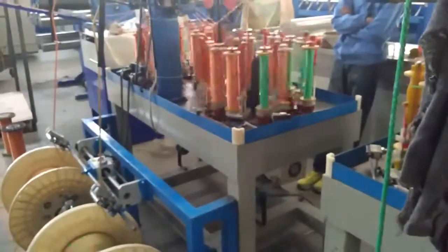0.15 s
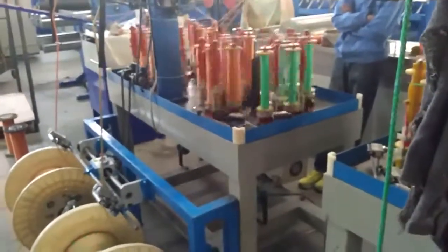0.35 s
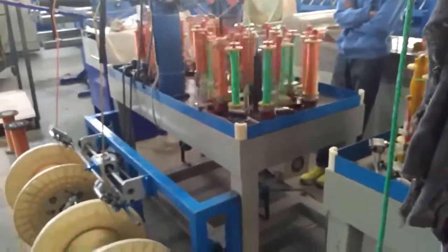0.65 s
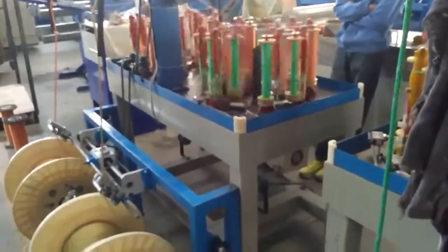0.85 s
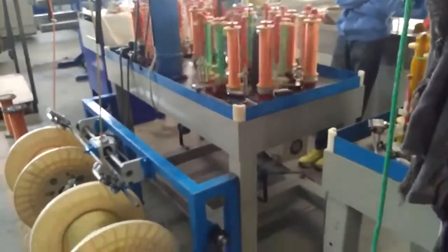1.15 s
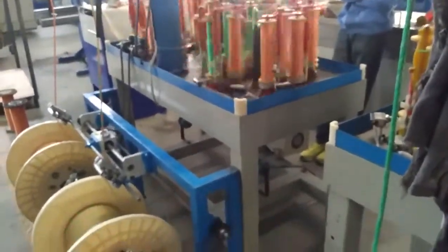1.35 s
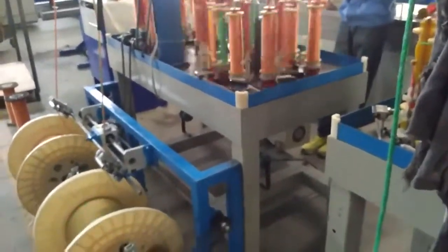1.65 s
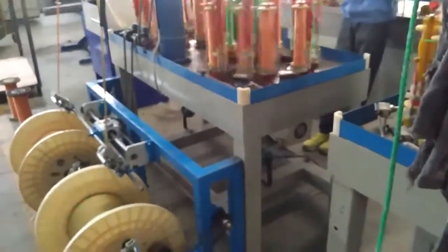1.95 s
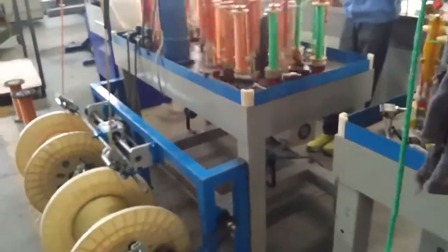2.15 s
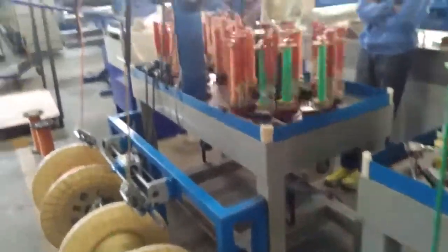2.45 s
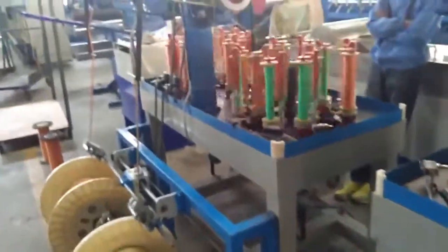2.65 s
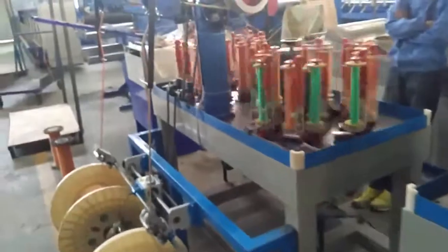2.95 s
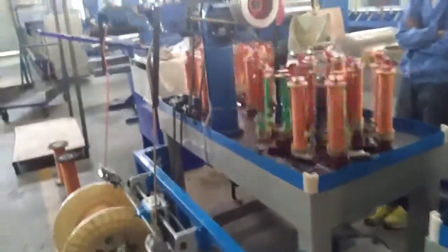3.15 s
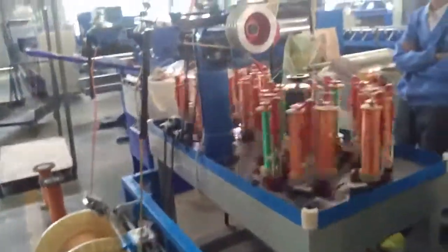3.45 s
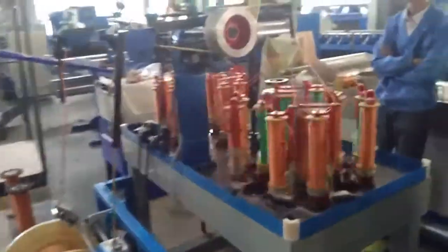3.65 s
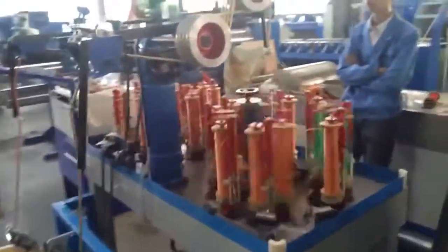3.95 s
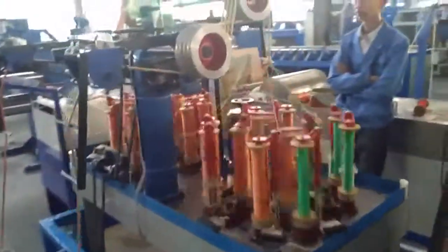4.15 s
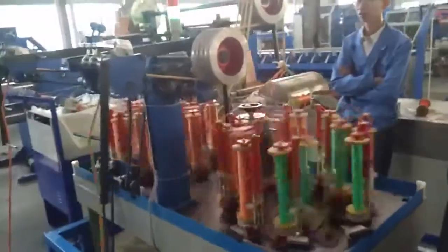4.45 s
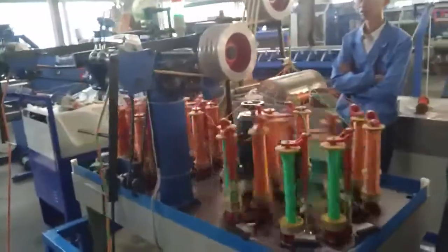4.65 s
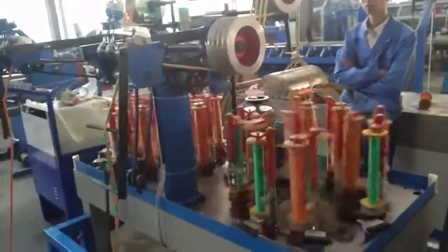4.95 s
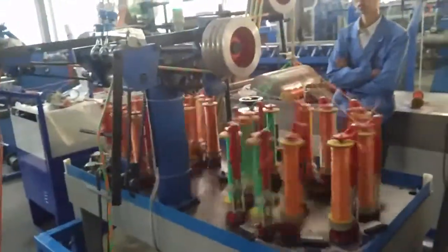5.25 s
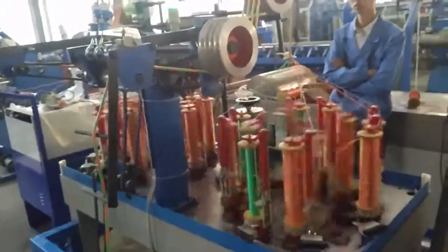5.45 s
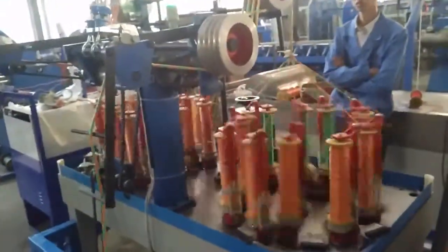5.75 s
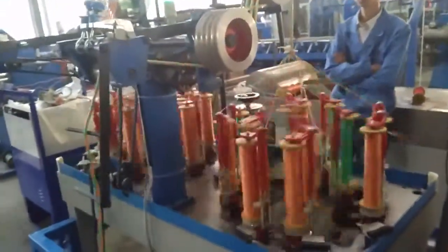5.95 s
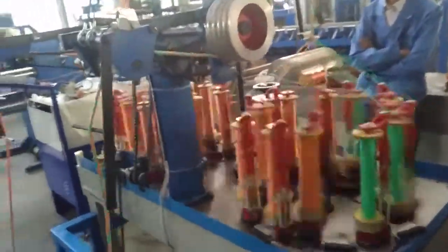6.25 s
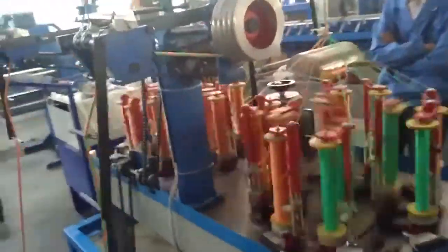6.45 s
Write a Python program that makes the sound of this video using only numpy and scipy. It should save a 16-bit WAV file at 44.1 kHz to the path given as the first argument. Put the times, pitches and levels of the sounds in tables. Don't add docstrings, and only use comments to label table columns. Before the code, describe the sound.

Several rope braiding machines run nonstop in a hard, reverberant factory hall. Bobbin carriers rattle around steel decks, clattering in quick even pulses about six a second, above a low drumming plate hum and a dense roar of farther machines. A faint high gear whine throbs within. A handheld stereo microphone moves nearer, so the metallic clatter gradually gets crisper; the sound is thin in the bass and slightly rough on top.

```python
import sys
import numpy as np
from scipy import signal
from scipy.io import wavfile
from scipy.ndimage import uniform_filter1d

SR = 44100
rng = np.random.default_rng(int(sys.argv[2]) if len(sys.argv) > 2 else 0)


def to_wav(s):
    ch = np.atleast_2d(s).T
    pcm = np.round(np.clip(ch, -1, 1) * 32767)
    wavfile.write(sys.argv[1], SR, pcm.astype(np.int16))


N = 291060

HANDOVERS_PER_S = 6.085
SIDES = np.array([[1], [-1]])
# frequency in Hz, level in dB per Hz.
CLATTER_SPECTRUM = [(1500, -20), (3000, -18), (5000, 2.5), (7000, 3.5), (9000, -1), (11000, 1), (13000, -4),
                    (15000, 5)]
# time in seconds, nearness from 0 to 1.
NEARNESS = [
    (0, 0.2),
    (1.2, 0.05),
    (2.4, 0.06),
    (3.4, 0.16),
    (4.4, 0.5),
    (5.4, 0.77),
    (6.6, 1.0),
]


def from_db(db):
    return 10 ** (np.asarray(db) / 20)


def mid_one(x):
    return x / np.sqrt(np.mean(x.mean(0) ** 2) + 1e-20)


def at_hz(points, hz):
    points_hz, values = np.array(points).T
    return np.interp(np.log(hz), np.log(points_hz), values)


def nearness_at(s):
    times, near = np.transpose(NEARNESS)
    return np.interp(s, times, near)


def drift(rate_hz):
    r = np.exp(-80 * np.pi * rate_hz / SR)
    slow = signal.lfilter([1], [1, -2 * r, r * r], rng.standard_normal(N // 40 + 2002))[2000:]
    return np.interp(np.arange(N) / 40, np.arange(len(slow)), slow / slow.std())


def resonance(x, hz, width_hz):
    r = np.exp(-np.pi * width_hz / SR)
    feed = np.sqrt((1 - r * r) / 2) * np.array([1, 0, -1])
    return signal.lfilter(feed, [1, -2 * r * np.cos(2 * np.pi * hz / SR), r * r], x)


def heard(pair, hz):
    # frequency in Hz, left-right correlation.
    likeness = [(40, .75), (67, .6), (106, .35), (170, .72), (270, 0.93), (340, 0.9), (430, 1), (540, 0.65),
                (855, 0.87), (1080, 0.61), (1360, -0.18), (1710, -0.43), (2150, 0.34), (2700, 0.21),
                (3400, -0.075), (5400, -0.2), (9000, -0.13)]
    # frequency in Hz, left over right in dB.
    lean = [(60, 0.0), (91, 2), (140, 1), (210, 2.5), (320, -1.5), (490, -3), (740, -2.5), (1130, -3.5),
            (1710, 3.5), (2600, 2.5), (3960, -1), (6020, 0), (9160, 0.5), (13900, -0.5)]
    # frequency in Hz, phase in radians.
    right_leads = [(100, 0), (170, .9), (340, .6), (430, .5), (680, .1), (900, 0)]
    alike = np.clip(at_hz(likeness, hz), -.9, .99)
    apart = np.sqrt((1 - alike) / (1 + alike)) * pair[1] * SIDES
    left, right = (pair[0] + apart) * from_db(at_hz(lean, hz) * SIDES / 2)
    lag_s = at_hz(right_leads, hz) / (2 * np.pi * hz)
    return np.array([np.roll(left, round(lag_s * SR)), right])


def impacts(per_s, spread_db):
    sizes = from_db(spread_db * np.minimum(rng.exponential(1, (4, N)), 4))
    sizes = sizes * rng.choice([-1, 1], (4, N))
    hits = sizes * (rng.random((4, N)) < per_s / SR)
    return (hits / hits.std()).reshape(2, 2, N) + 1e-18


def through_bands(drive, spectrum, low_hz, swing_db):
    edges = low_hz * 2 ** np.arange(0, np.log2(15500 / low_hz), 1 / 6)
    out = 0
    for k, (low, high) in enumerate(zip(edges, edges[1:])):
        hz = np.sqrt(low * high)
        band = signal.butter(2, [low, high], "band", fs=SR, output="sos")
        pair = signal.sosfilt(band, drive[k % 2])
        out = out + from_db(at_hz(spectrum, hz) + swing_db(hz)) * heard(pair, hz)
    return mid_one(out)


def contact_swells(turns):
    # phase from 0 to 1, fade in cycles,
    # then the swell of din, upper din and clatter in dB.
    contacts = [
        (0.169, 0.255, 1.5, 3, 6),
        (.46, .9, 2, 4, 6.0),
    ]
    rise_s = 0.0045
    swells = 0
    for phase, fade, *lift_db in contacts:
        swells = swells + np.outer(lift_db, np.exp(-((turns - phase) % 1) / fade))
    swells = uniform_filter1d(swells, size=round(rise_s * SR), axis=1)
    return swells - swells.mean(axis=1, keepdims=True)


def clatter(effort_db):
    bursts_db = 1.2 * effort_db + 1.9 * drift(25.0)
    drive = impacts(per_s=5000 * from_db(bursts_db), spread_db=2.5)

    def swing_db(hz):
        return 1.15 * np.log2(hz / 3000) * effort_db + 2.0 * drift(15.0)
    return through_bands(drive, CLATTER_SPECTRUM, 1366, swing_db)


def rings(effort_db):
    hits = impacts(per_s=900 * from_db(effort_db), spread_db=3.0)[0]
    dealt = rng.integers(0, 48, (2, N))
    pitches = np.geomspace(3000, 13800, 48) * (1 + .01 * rng.standard_normal(48))
    out = 0
    for k, hz in enumerate(pitches):
        level_db = at_hz(CLATTER_SPECTRUM, hz) + 2.0 * np.log2(7000 / hz)
        out = out + from_db(level_db) * resonance(hits * (dealt == k) + 1e-18, hz, 38.0)
    return mid_one(out)


def knock_list():
    # phase from 0 to 1, peak in dB, spread in dB, ring in Hz.
    knocks = [
        (.16, -30.5, 3.5, 6350),
        (.465, -32, 5.5, 8600),
    ]
    # time in seconds, peak in dB, ring in Hz.
    strays = [
        (0.0543, -15, 9660),
        (0.7327, -21, 6530),
        (2.8729, -18, 6470),
        (4.0018, -15, 10000),
        (4.357, -18, 7650),
        (5.476, -17, 7000),
        (6.0142, -17, 6460),
        (6.1594, -16, 7590),
    ]
    near_db, jitter_s = 0.5, .0025
    rows = list(strays)
    for phase, peak_db, spread_db, hz in knocks:
        luck = rng.standard_normal((int(N / SR * HANDOVERS_PER_S), 3))
        s = (np.arange(len(luck)) + phase) / HANDOVERS_PER_S + jitter_s * luck[:, 0]
        peaks_db = peak_db + near_db * nearness_at(s) + spread_db * luck[:, 1]
        rows += zip(s, peaks_db, hz * 2 ** (0.21 * luck[:, 2]))
    return rows


def ticks():
    after = np.arange(4410) / SR
    out = np.zeros((2, N + len(after)))
    top = signal.butter(2, 4000, "high", fs=SR, output="sos")
    for s, peak_db, hz in knock_list():
        burst = signal.sosfilt(top, rng.standard_normal(len(after)))
        burst = burst * from_db(-60 * after / 0.065)
        burst = .5 * burst + 0.95 * resonance(burst, hz, 1200.0)
        start = round(s * SR)
        side_db = rng.uniform(-1, 1) * SIDES
        out[:, start:start + len(after)] += from_db(peak_db - 13.5 + side_db) * burst
    return out[:, :N]


def boom(t, near):
    round_s, top_s, depth_db, sharpness, near_db = 1.333, 1.104, 4.5, 2.9, 4
    swell = np.exp(sharpness * (np.cos(2 * np.pi * (t - top_s) / round_s) - 1))
    return depth_db * swell + near_db * near - 2.5


def deck_swell(turns):
    once_db, once_top = 3.8, .88
    twice_db, twice_top = 2.4, 0.078
    once = once_db * np.cos(2 * np.pi * (turns - once_top))
    return once + twice_db * np.cos(4 * np.pi * (turns - twice_top))


def deck(beat_db, boom_db):
    # frequency in Hz, width in Hz, level in dB.
    plate_modes = [(266.7, 4.3, -12.5), (303.3, 31, -8), (323.5, 8.6, -3), (331.8, 12, -3.5),
                   (345.1, 8.5, -5.5), (368.4, 20, -3.5), (393.2, 15, -9.5), (452, 6.8, -15)]
    out = 0
    for hz, width_hz, level_db in plate_modes:
        drive = rng.standard_normal((2, N + SR // 2))
        pair = resonance(resonance(drive, hz, 1.8 * width_hz), hz, 1.8 * width_hz)[:, SR // 2:]
        pair /= np.abs(signal.hilbert(pair / pair.std())) ** .4 + .1
        upper = np.clip((hz - 336) / 24, 0, 1)
        late = round(upper * .5 / HANDOVERS_PER_S * SR)
        swell_db = (1 - upper) * boom_db + np.roll(beat_db, late)
        out = out + from_db(level_db + swell_db) * heard(pair / pair.std(), hz)
    return mid_one(out)


def thumps():
    count = int(N / SR * HANDOVERS_PER_S)
    luck = rng.standard_normal((count, 2))
    kicks = np.zeros(N)
    at_s = (np.arange(count) + .47 + 0.01 * luck[:, 0]) / HANDOVERS_PER_S
    kicks[(at_s * SR).astype(int)] = from_db(2 * luck[:, 1])
    fade = from_db(-60 / (.2 * SR))
    shake = signal.lfilter([1], [1, -fade], kicks + 1e-18) * rng.standard_normal((2, N))
    return mid_one(heard(resonance(resonance(shake, 203, 100), 203, 100), 236))


def mesh(turns):
    # side line number, level in dB.
    gear_lines = [
        (-1, -26.5),
        (0, -30.5),
        (1, -50),
        (2, -37),
    ]
    mesh_hz = 363.0
    t = np.arange(N) / SR
    tone = 0
    for k, db in gear_lines:
        level = from_db(db - 1.5 + 1.7 * drift(1.0))
        angle = 2 * np.pi * (mesh_hz * t + k * (turns - .17)) + 0.63 * drift(0.32)
        tone = tone + level * np.sin(angle)
    return heard([tone, np.zeros(N)], mesh_hz)


def din(low_db, high_db):
    # frequency in Hz, level in dB per Hz.
    din_spectrum = [(30, 8.5), (100, -30), (140, -22.5), (190, -12), (250, -13.5), (450, -7.5), (620, -10),
                    (850, -2), (1250, -3), (2300, -4.5), (2900, -10.5), (5000, -19), (8000, -37.5),
                    (14000, -41)]
    # frequency in Hz, width in Hz, level in dB,
    # left over right in dB, change on the walk in dB per second.
    frame_modes = [(861, 44, -14.5, -2, -.5), (980, 200, -18, -2, 2.2), (1202, 30, -13, 2, -0.4),
                   (1272, 40, -13.5, -1, -2.1), (1348, 22, -14.5, 7.5, 0.5), (1430, 69, -25, 0.5, 4),
                   (1664, 15, -31, -5, -1), (1772, 22, -19.5, -4.5, -2.5), (2053, 42, -18, -7, 0),
                   (2286, 125, -18, 9, -0.5), (2594, 74, -20, -4, 0.5)]
    together = drift(9.8)

    def swing_db(hz):
        share = np.clip(np.log2(hz / 1500) / 1.7, 0, 1)
        return (1 - share) * low_db + share * high_db + 0.14 * together + 1.0 * drift(11.2)
    out = through_bands(impacts(per_s=14000, spread_db=2.5), din_spectrum, 28.17, swing_db)
    knocks = impacts(per_s=2500, spread_db=2.5)
    from_middle_s = np.arange(N) / SR - 3.3
    for k, (hz, width_hz, level_db, pan_db, db_per_s) in enumerate(frame_modes):
        pair = resonance(knocks[k % 2], hz, width_hz)
        moving_db = level_db + db_per_s * from_middle_s + 2.0 * drift(5.3) + low_db
        out += from_db(moving_db + pan_db * SIDES / 2) * heard(pair, hz)
    return out


def whine():
    hz, width_hz = 4165, 175
    tone = resonance(resonance(rng.standard_normal((2, N)), hz, width_hz), hz, width_hz)
    return mid_one(tone * from_db(0.83 * drift(16.0)))


def scene():
    t = np.arange(N) / SR
    turns = t * HANDOVERS_PER_S
    near = nearness_at(t)
    deck_db = -24 - 0.35 * near
    din_db = -19 - 0.06 * near
    clatter_db = -40.5 + 5 * near
    whine_db = -37 - 2.5 * near
    din_beat, upper_beat, clatter_beat = contact_swells(turns)
    return (from_db(clatter_db) * clatter(clatter_beat)
            + from_db(clatter_db - 2.0) * rings(clatter_beat)
            + ticks()
            + from_db(deck_db) * deck(deck_swell(turns), boom(t, near))
            + from_db(-44.0) * thumps()
            + mesh(turns)
            + from_db(din_db) * din(din_beat, upper_beat)
            + from_db(whine_db + 1.3 * upper_beat) * whine())


def treble_grain(x, grain_db, hole_db):
    hz, _, cells = signal.stft(x, SR, nperseg=1024)
    luck = rng.standard_normal((2,) + cells.shape[1:])
    grain = uniform_filter1d(luck[0], size=2, axis=1) * np.sqrt(2)
    patches = uniform_filter1d(uniform_filter1d(luck[1], size=4, axis=0), size=9, axis=1) * 6
    holes = np.clip(patches - 1.5, 0, 1)
    treble = np.clip(np.log2((hz[:, None] + 1) / 900) / 3, 0, 1)
    gain = from_db(treble * (grain_db * grain - hole_db * treble ** 3 * holes))
    gain /= np.sqrt(np.mean(gain ** 2, axis=1, keepdims=True))
    return signal.istft(cells * gain, SR, nperseg=1024)[1][:, :N]


def top_cut(x):
    return signal.sosfilt(signal.butter(12, 14520, fs=SR, output="sos"), x)


def record(dry):
    thin = signal.sosfilt(signal.butter(3, 170, "high", fs=SR, output="sos"), dry)
    thin = signal.sosfilt(signal.cheby2(8, 40, 14900, fs=SR, output="sos"), thin)
    rounded = 1.5 * np.tanh(thin / 1.5)
    return top_cut(treble_grain(rounded, grain_db=4.6, hole_db=30.))


dry = scene()
out = record(dry)
to_wav(out)
```